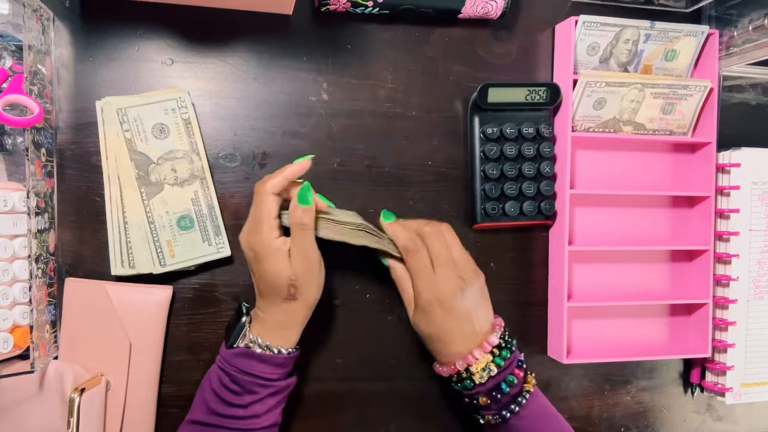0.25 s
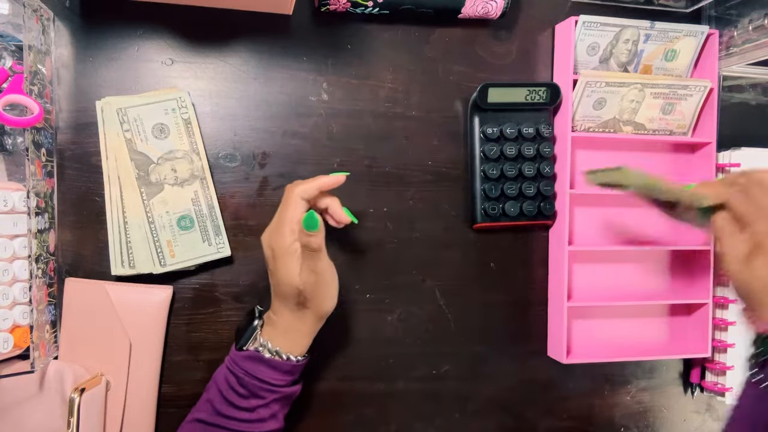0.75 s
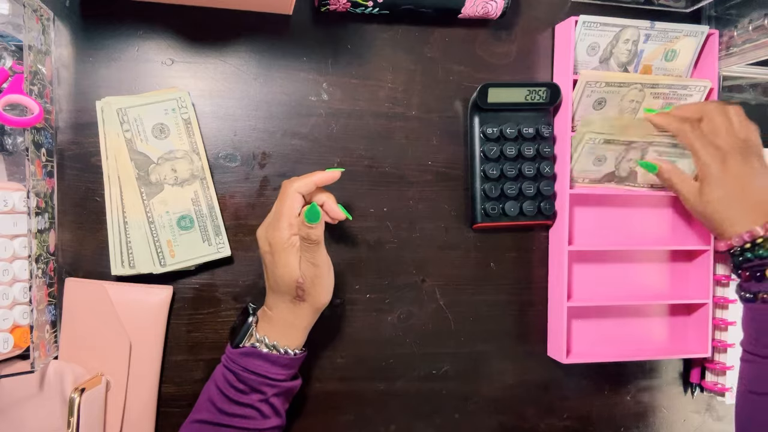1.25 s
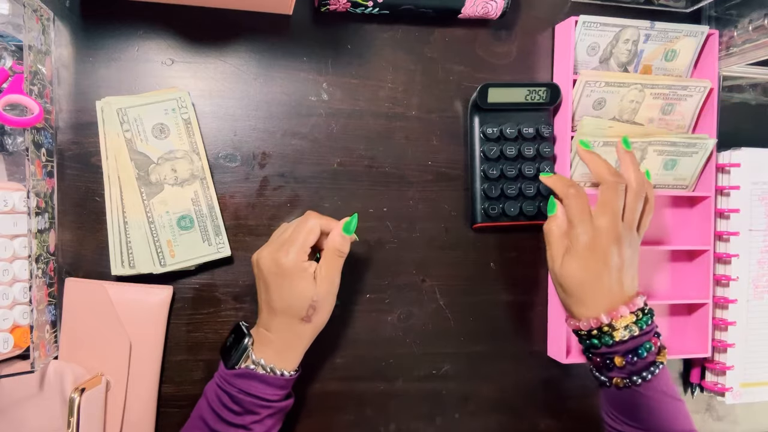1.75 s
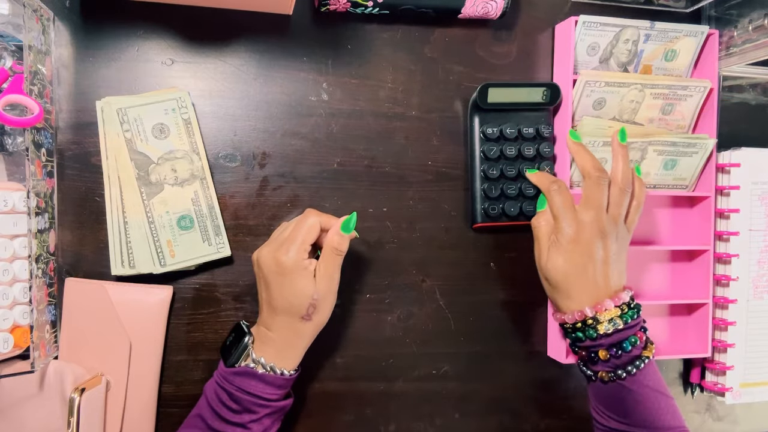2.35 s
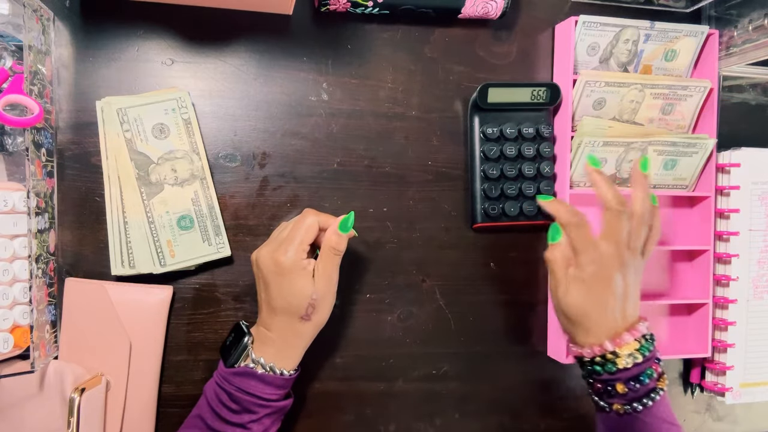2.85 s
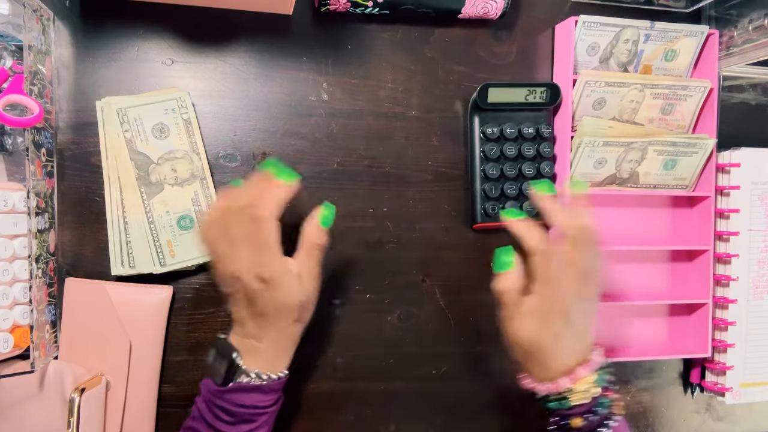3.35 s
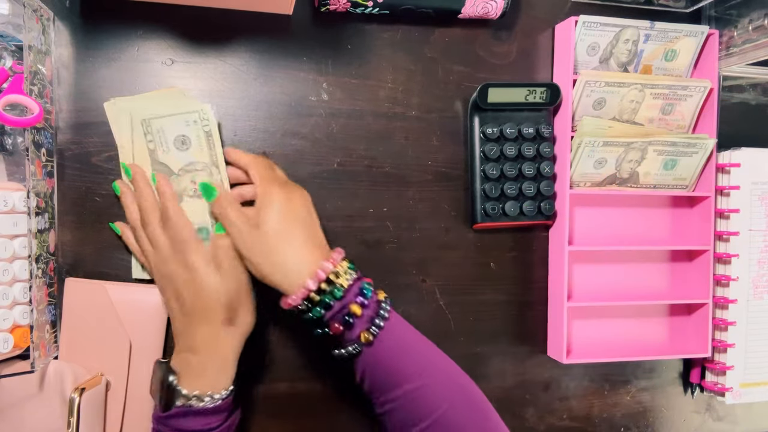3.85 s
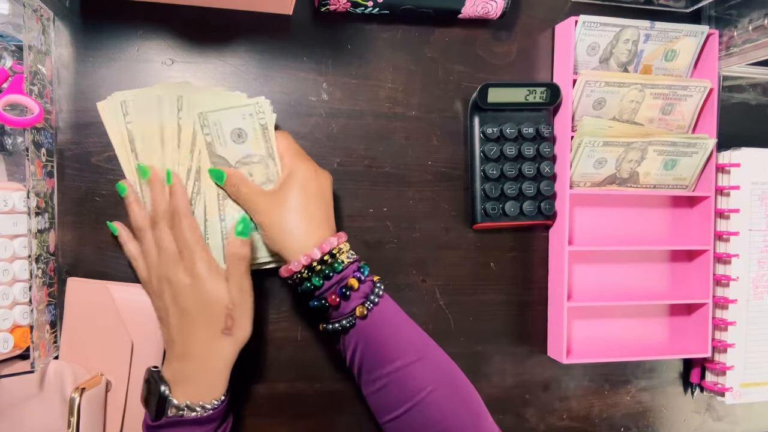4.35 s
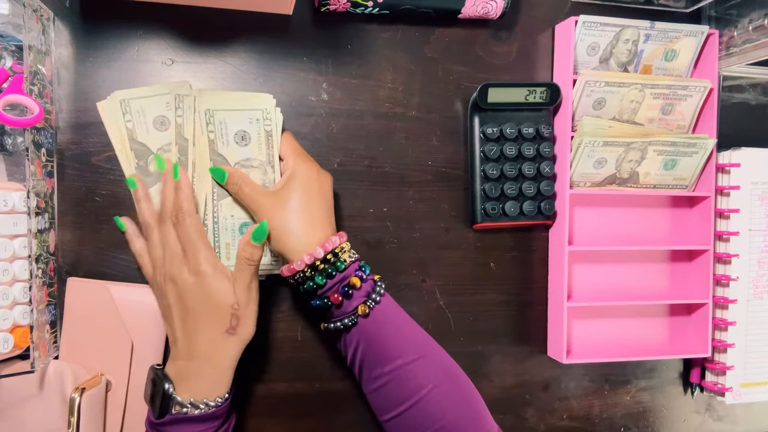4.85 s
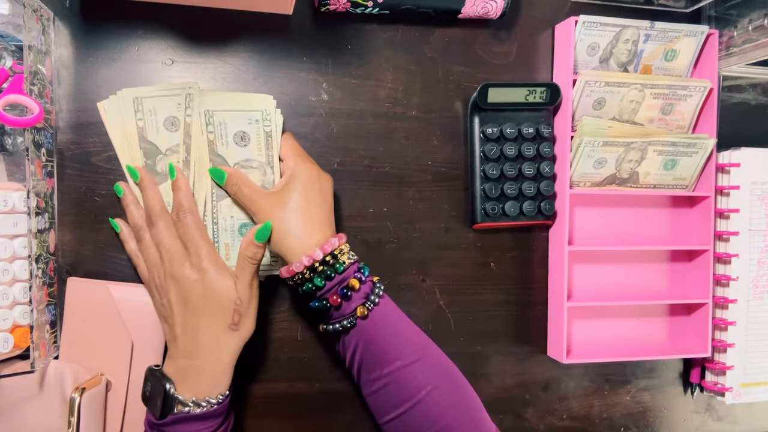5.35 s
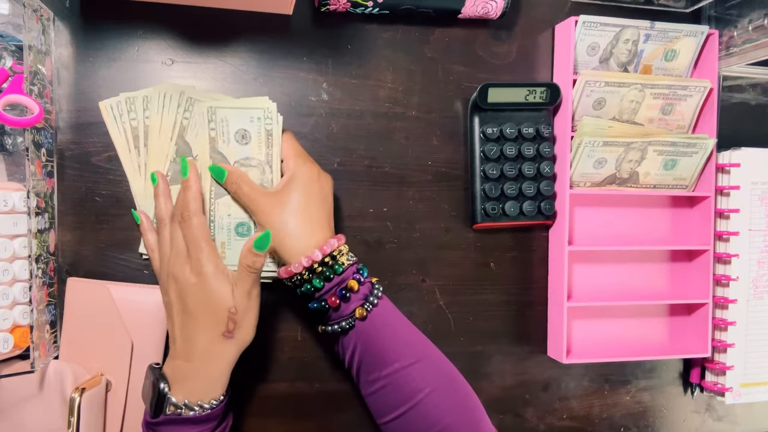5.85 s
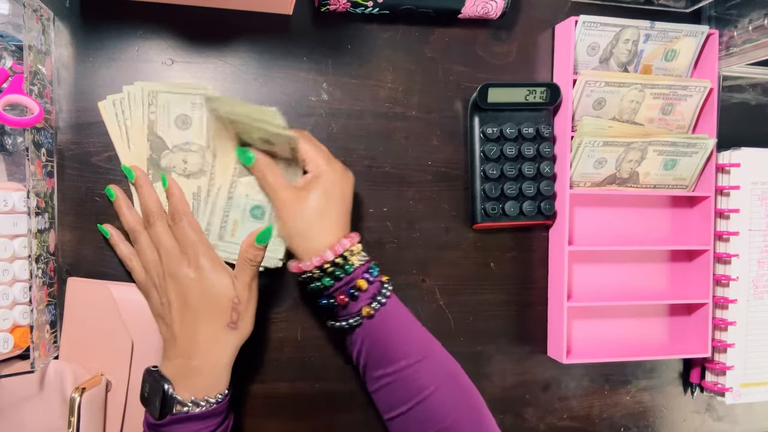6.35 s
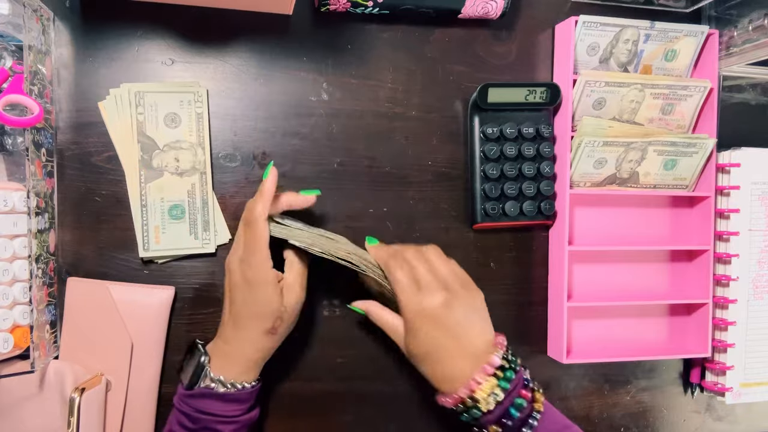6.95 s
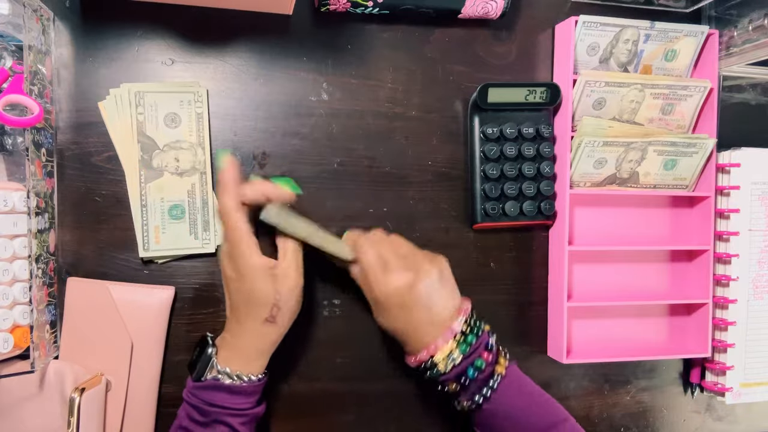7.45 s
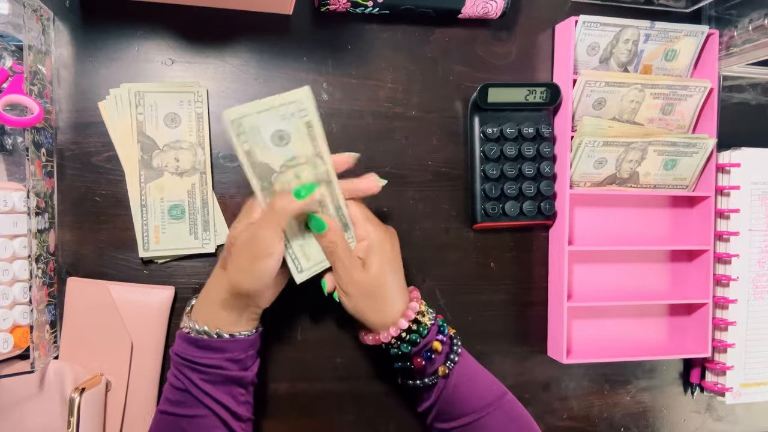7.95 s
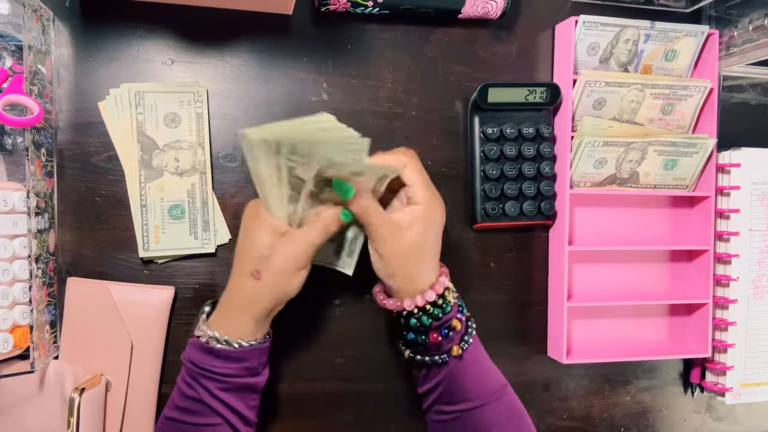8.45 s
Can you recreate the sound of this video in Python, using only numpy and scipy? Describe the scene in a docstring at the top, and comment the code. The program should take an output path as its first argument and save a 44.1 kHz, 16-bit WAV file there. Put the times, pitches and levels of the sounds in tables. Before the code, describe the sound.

Close stereo pickup at a desk in a quiet room with short reverberation, low rumble and soft air. From 0 s paper notes slide with flickering hiss and fine crackle; a bundle edge knocks at 0.25 s. Stronger rustles and papery snaps come at 1.0-1.3 s, fading by 1.6 s with a bead tick. Four separate clacky plastic calculator presses follow at about 2.15, 2.35, 2.7 and 3.1 s, each with a lighter return click; a faint low hum runs from 2.15 to 4 s. From 3.3 s paper sliding returns, with a soft desk touch at 3.55 s and irregular gentle shuffles and small snaps through 6.5 s. At 6.7 s the bundle strikes the desk sharply with a bright swish. Slides, dull thuds near 7.3 s and crisp flicks at 7.7-7.9 s lead to a very loud snap at 8.5 s and a rapid cluster of rustling snaps.

```python
"""Paper notes sorted at a desk in a quiet room, heard by two microphone ports over steady rumble and air.
From the start notes slide (flickering band noise, crackle) and snap (resonant bursts); an early bundle knock.
From 2.1 s four clacky calculator presses (bursts plus ringing modes), under a faint hum until 4 s.
From 3.3 s slides and snaps return; the bundle knocks again near 6.7 s, loud snaps follow near 8.5 s.
Soft desk thuds and bracelet-bead ticks (resonant bursts) fall in between."""
import sys
import numpy as np
from scipy import signal
from scipy.fft import rfft, irfft, next_fast_len
from scipy.io import wavfile

SR = 44100
rng = np.random.default_rng(int(sys.argv[2]) if len(sys.argv) > 2 else 0)


def materialize(psi):
    """Save the field psi as 16-bit PCM at rate SR to the path in sys.argv[1].

    A 1-D psi becomes a single channel; in a 2-D psi each row is a channel.
    """
    bounded = np.clip(np.atleast_2d(psi).T, -1, 1)
    quanta = np.round(bounded * 32767).astype(np.int16)
    wavfile.write(sys.argv[1], SR, quanta)


N = 383229

LEAN_DB, LEAN_SPREAD_DB = -4.5, 2.5   # left-right lean of the hands' sounds

# note strokes, relative levels: [start/s, swell/s, hold/s, hiss/dB, body re hiss/dB, dull re hiss/dB]
STROKES = [(0.0, 0.0065, 0.075, -66, -6, -8.5), (0.055, 0.043, 0.023, -63, -2, -4),
           (0.168, 0.026, 0.045, -71.5, -8, -4), (0.304, 0.039, 0.22, -63.5, -4.5, -9.5),
           (.62, 0.05, 0.24, -82, -6.5, -7), (0.972, 0.018, .1, -59.5, -3, -0.5),
           (1.099, 0.038, .01, -52.5, 5, -1.5), (1.163, 0.025, 0.046, -61.5, 4, -0.5),
           (1.249, 0.052, 0.02, -53, 2.5, -7), (1.445, 0.048, .03, -76, -11.5, -13),
           (1.537, 0.016, 0.019, -62.5, -18, -22), (3.3, 0.34, 0.048, -66.5, -13, -13),
           (3.495, 0.025, 0.14, -70, -3, -5), (3.651, 0.054, 0.053, -64, -4.5, 2.5),
           (3.78, 0.029, 0.1, -68, -3.5, -13), (3.977, 0.024, 0.019, -56.5, -7, -8.5),
           (4.093, .03, 0.092, -65, -5, -1.5), (4.251, 0.022, 0.015, -74, 8, 15.5),
           (4.297, 0.066, 0.065, -64.5, -2.5, -16), (4.49, 0.016, 0.0058, -78, 7, -8),
           (4.632, 0.069, 0.022, -57.5, 0, -8), (4.938, 0.03, 0.04, -68.5, 3, -6),
           (4.998, 0.021, 0.019, -67.5, 5, -3), (5.139, 0.025, 0.0078, -76.5, 7, 0.5),
           (5.432, 0.024, 0.029, -74, -9.5, -9), (5.551, 0.073, .04, -82, -4, -4),
           (5.667, 0.035, 0.036, -59.5, -0.5, -4.5), (5.847, .03, 0.046, -76.5, -2, -2),
           (6.017, 0.043, 0.2, -73, -5, -13), (6.188, 0.042, 0.041, -63, -0.5, -18),
           (6.298, 0.035, 0.08, -70.5, -1, -13), (6.458, .03, 0.083, -74, -8, -10),
           (6.665, .05, .01, -60.5, -1.5, 2), (6.698, 0.021, .005, -42, -1, -7.5),
           (6.798, 0.038, 0.029, -55.5, -3.5, -12), (6.894, 0.027, 0.3, -69, -4.5, -3),
           (7.264, 0.035, 0.055, -65, -10, -1), (7.361, 0.074, 0.012, -56.5, 0.5, -3),
           (7.522, 0.076, 0.2, -69, -5.5, -8), (7.65, 0.088, 0.023, -60, -7, -7),
           (7.769, 0.061, 0.0077, -58.5, -5.5, -14), (7.882, 0.034, 0.06, -64, -9.5, -20),
           (8.024, 0.036, 0.043, -62.5, -13, -8), (8.117, 0.069, 0.037, -63.5, -6, -18),
           (8.262, 0.045, 0.0086, -62.5, -1, -1.5), (8.34, .04, 0.09, -67, -13, -12),
           (8.5, 0.017, .05, -62, -16, -10), (8.553, 0.046, 0.044, -41.5, -4, -12.5)]
SWELL_DB, FADE_DB_PER_S = 17, 279.5
BRIGHT_DB, BRIGHT_PER_BODY = -5, -0.4   # bright re hiss, less when the body is strong


def stroke_levels():
    """Gains of dull, body, hiss and bright bands: strokes swell, hold and fade, summed in power."""
    t = np.arange(0, N, 64) / SR
    power = 1e-14
    for start, swell, hold, hiss_db, body_db, dull_db in STROKES:
        rise_db = np.minimum(SWELL_DB * ((t - start) / max(swell, .005) - 1), 0)
        fade_db = FADE_DB_PER_S * np.maximum(t - start - swell - hold, 0)
        band_db = np.array([dull_db, body_db, 0, BRIGHT_DB + BRIGHT_PER_BODY * body_db])
        level_db = np.maximum(hiss_db + rise_db - fade_db, -150)
        power = power + from_db(level_db + band_db[:, None]) ** 2
    return [np.interp(np.arange(N) / SR, t, gain) for gain in np.sqrt(power)]


def crackle():
    """Bent sheets ring at pitches that come and go, fed by rubbing and clumps of tiny crease pops."""
    born = rng.random(N) < 350 * from_db(8 * drift(12)) / SR   # about 350 pops/s, clumped
    height = from_db(5.5 * np.minimum(rng.exponential(1, N), 4))
    pops = rms_one(born * height * rng.choice([-1, 1], N))
    dealt = rng.integers(0, 10, N)   # which resonance each pop feeds
    rub = 0.12 * rng.standard_normal(N)
    out = 0
    for k, hz in enumerate(np.geomspace(950, 2300, 10)):
        ring = signal.iirpeak(hz, 5.0, SR)
        feed = pops * (dealt == k) + from_db(5.5 * drift(8)) * rub
        out = out + signal.lfilter(*ring, signal.lfilter(*ring, feed))
    return rms_one(out)


# paper noise colour, used by slides and hits: [f/Hz, level/dB per Hz, relative]
PAPER = [(150, -3), (270, 0.5), (480, -1.5), (700, -4.5), (1100, -1), (2200, -3.5), (2800, -6),
         (4100, -2.5), (5500, -5.5), (8000, -5.5), (12000, -4), (17000, -2.5)]


def slide():
    """Fibres rub as hiss that flickers band by band; creases crackle in the body band."""
    gains = stroke_levels()
    together = drift(15)
    mix = 0
    for gain, part in zip(gains, bands(colour(rng.standard_normal(N), PAPER))):
        flicker_db = 2.4 * together + 1.2 * drift(30)
        mix = mix + gain * from_db(-3.5 + flicker_db) * part
    mix += gains[1] * from_db(-3) * crackle()
    return leaning(mix, LEAN_DB + LEAN_SPREAD_DB * drift(8.9))


# creases and edges, relative levels: [t/s, level/dB, f/Hz, t60/s, dull/dB, bright/dB]
SNAPS = [(0.235, -49, 1880, 0.067, -34, 4), (0.379, -45, 980, 0.079, -34, -15),
         (0.528, -48.5, 3200, .035, -24, -18), (0.623, -65, 4430, .04, -10, -20),
         (0.983, -44.5, 1830, .033, -8, -11), (0.999, -39, 1400, 0.036, -15, -26),
         (1.124, -48, 2080, .03, -23, -2), (1.149, -30.5, 2210, 0.077, -19, -14),
         (1.178, -39, 1310, 0.037, -30, -21), (1.295, -44.5, 1050, .03, 2, -10),
         (1.312, -38, 1180, 0.054, -8.5, -7), (3.999, -48, 1880, 0.019, -24.5, -9.5),
         (4.098, -51.5, 1340, 0.059, -30, -16), (4.603, -48.5, 1310, 0.059, -31, -8),
         (4.798, -50, 1630, 0.039, -6.5, -28), (4.901, -57.5, 990, 0.055, -27.5, -4),
         (4.966, -46, 1300, .024, -3.5, -22), (5.162, -53.5, 1640, .047, -30, -27),
         (5.269, -50.5, 1130, 0.037, -1, -15), (5.869, -59.5, 1400, 0.065, -27.5, -20),
         (6.197, -55.5, 1800, .055, -21, -10.5), (6.402, -52, 1956, .016, -13, -9),
         (6.431, -45.5, 1590, .026, -22.5, -19), (7.053, -43.5, 1250, 0.058, -5.5, -14),
         (7.196, -55, 4400, .028, -21.5, -7), (7.664, -48.5, 4680, 0.065, -26, -17.5),
         (7.719, -42, 2570, 0.025, -31, 0.5), (7.732, -39.5, 3600, .022, -30, -15),
         (7.742, -47, 1330, .02, -25, -17), (7.86, -33.5, 1770, .021, -23, -25),
         (8.063, -54, 3020, 0.029, -19.5, -12), (8.324, -41.5, 766, 0.05, -13, -9),
         (8.446, -40.5, 980, 0.02, -3.5, -25), (8.476, -35.5, 825, 0.053, -22, -17),
         (8.49, -12.5, 2600, 0.02, -23.5, -10.5), (8.549, -24.5, 1900, 0.018, -21, -14),
         (8.568, -34.5, 2200, .035, -16, -12), (8.608, -22.5, 900, 0.073, -17, -8.5),
         (8.622, -20.5, 980, 0.041, -9, -11), (8.646, -22.5, 1060, 0.031, -17, -13)]
SNAP_DULL_HZ = 640


def snaps():
    """A crease or edge flips abruptly: a click excites a mid and a dull resonance."""
    return hits([(s, db, hz, SNAP_DULL_HZ, *rest) for s, db, hz, *rest in SNAPS])


# bundle edges landing one after another, relative levels: [t/s, level/dB, f/Hz, dull f/Hz, bright/dB]
KNOCKS = [(0.247, -43, 1760, 400, -25.5), (0.261, -24, 2580, 260, -26), (0.265, -28, 1700, 250, -25.5),
          (6.717, -18, 3660, 520, -0.5), (6.722, -10.5, 984, 500, -28), (6.731, -21, 4100, 440, -21),
          (6.74, -22.5, 2010, 510, -28)]
KNOCK_T60_S, KNOCK_DULL_DB = 0.063, -3.5


def knocks():
    """Bundle edges strike the desk in quick succession, each a burst with two resonances."""
    return hits([(s, db, hz, dull_hz, KNOCK_T60_S, KNOCK_DULL_DB, bright_db)
                 for s, db, hz, dull_hz, bright_db in KNOCKS])


# key press steps, relative levels: [t/s, level/dB, cap f/Hz, dull/dB]
NAIL_TOUCHES = [(2.139, -34.5, 2370, -38), (2.332, -32, 2320, -34), (2.669, -31, 1360, -17),
                (3.097, -38.5, 2740, -17.5)]
BOTTOMINGS = [(2.164, -24, 2310, -7.5), (2.347, -21.5, 2480, -14.5), (2.686, -27.5, 2600, -2),
              (3.112, -22.5, 2130, -11)]
RETURNS = [(2.241, -30, 1010, -16), (2.419, -29.5, 2250, -12), (2.751, -32, 2320, -5.5),
           (3.181, -26.5, 1190, -13.5)]
# contacts within a step: [offset from step t/s, level/dB re step, t60/s, dull/dB re step, bright/dB]
TOUCH = [(0, 0.5, 0.026, -0.5, -1.5)]
BOTTOMING = [(-.006, -9.5, 0.067, -11.5, 3.5), (0, 1.5, 0.02, 1, -12), (.011, -8, .022, 1.5, -7)]
RETURN = [(0, 1, 0.018, 0.5, -4), (.005, -9, 0.023, 3.5, -9)]
# cap noise colour: [f/Hz, level/dB per Hz, relative]
PLASTIC = [(150, 4.5), (350, 10.5), (700, -9), (1200, -6.5), (2300, -6.5), (4000, -7.5), (8000, -3.5),
           (14000, 6.5), (17000, -10.5)]
# modes of calculator case and caps, then of its base on the desk: [f/Hz, level/dB, t60/s], relative
CASE = [(1118, -3, 0.1), (1360, 4.5, 0.036), (1852, -3, 0.18), (2210, -0.5, 0.098), (2140, -12.5, 0.13),
        (2560, -18, 0.033), (2740, -1.5, 0.1), (3790, -6.5, 0.12), (4154, -10.5, 0.23), (4660, -8.5, 0.036),
        (5230, -14.5, 0.027)]
BASE = [(208, -7.5, 0.11), (272, -9, 0.24), (361, -7.5, 0.058)]


def keys():
    """Each contact rattles its cap, rings the case faintly and pushes the base on the desk."""
    rows = [(moment + after, db + contact_db, hz, t60, dull_db + contact_dull_db, bright_db)
            for steps, contacts in [(NAIL_TOUCHES, TOUCH), (BOTTOMINGS, BOTTOMING), (RETURNS, RETURN)]
            for moment, db, hz, dull_db in steps
            for after, contact_db, t60, contact_dull_db, bright_db in contacts]
    s, level_db, cap_hz, t60, dull_db, bright_db = np.transpose(rows)
    noise = resonate(struck(len(s), PLASTIC, crack_db=14), cap_hz, 9.0, 4.0)
    rattle = bursts(noise, level_db - 4, t60, dull_db + 2.5, bright_db, tail_db=-16.5)
    case = ringing(CASE, level_db - 23.5)
    base = ringing(BASE, level_db + dull_db - 9)
    return place(s, rattle + case + base, scattered_lean(len(s)))


# soft touches on the desk: [t/s, level of the dull part/dB, relative]
THUDS = [(3.546, -48.5), (3.739, -61), (4.29, -62.5), (7.25, -44.5), (7.365, -40.5)]
# one row: [f/Hz, dull f/Hz, t60/s, dull re middle/dB, bright re middle/dB]
THUD_SHAPE = (1093, 257, 0.14, 18, -20)


def thuds():
    """Soft touches on the desk, mostly dull resonance."""
    return hits([(s, db - THUD_SHAPE[3], *THUD_SHAPE) for s, db in THUDS])


# bracelet beads: [t/s, level of the bright part/dB, relative]
TICKS = [(.504, -51), (1.398, -55), (1.543, -39.5), (4.964, -44.5), (6.465, -56.5), (6.509, -63),
         (7.293, -55), (7.508, -43), (8.071, -45)]
# one row: [f/Hz, dull f/Hz, t60/s, dull re middle/dB, bright re middle/dB]
TICK_SHAPE = (5009, 248, 0.08, -28, 16.5)


def bead_ticks():
    """Small hard beads click, mostly in the bright band."""
    return hits([(s, db - TICK_SHAPE[4], *TICK_SHAPE) for s, db in TICKS])


ROOM_T60_S, ROOM_DB = 0.25, -12.5


def room(x):
    """Two unrelated dying noise tails, duller than the source."""
    t = np.arange(round(.4 * SR)) / SR
    tails = rng.standard_normal((2, len(t))) * from_db(-60 * t / ROOM_T60_S) * (t > .004)
    tails = colour(tails, [(200, -5.5), (3000, -4.0), (15000, -10.5)])
    tails = tails / np.sqrt(np.sum(tails ** 2, axis=1, keepdims=True))   # unit energy
    return from_db(ROOM_DB) * signal.fftconvolve(x[None], tails, axes=1)[:, :N]


# level of rumble and air ahead of the port colours: [t/s, level/dB]
RUMBLE = [(0.0, -61), (2.83, -62), (3.17, -62.5), (3.41, -62.5), (3.82, -59), (4.23, -64), (5.28, -65),
          (5.81, -63), (6.58, -65), (6.73, -61.5), (8.3, -64), (8.69, -67.5)]
# spectrum of rumble and air: [f/Hz, level/dB per Hz, relative]
AIR = [(15, -73), (25, -40), (45, -15), (66, -2), (92, -13.5), (126, -8), (190, -27), (286, -30),
       (323, -48), (401, -33.5), (770, -47), (1670, -46), (5850, -56.5), (6280, -54), (8000, -58.5),
       (10400, -77.5), (17600, -120)]
# faint far hum ahead of the port colours: [t/s, f/Hz, rms level/dB]
DRONE = [(2.15, 165, -69), (2.65, 166, -68), (2.8, 175, -66), (3.3, 176, -66), (3.75, 176, -68),
         (4.0, 176, -75)]


def background():
    """Low rumble and air as unrelated coloured noise, plus a far hum as a gliding sine."""
    spectrum = AIR + [(17000, AIR[-1][1] - 3)]   # flat floor above 17 kHz
    air = from_db(in_time(RUMBLE)[0]) * rms_one(colour(rng.standard_normal((2, N)), spectrum))
    hum_hz, hum_db = in_time(DRONE)
    t = np.arange(N) / SR
    sounding = np.clip(np.minimum(t - DRONE[0][0], DRONE[-1][0] - t) / 0.033, 0, 1)
    hum = np.sqrt(2) * from_db(hum_db) * np.sin(2 * np.pi * np.cumsum(hum_hz) / SR)
    air[0] += sounding * hum
    return air


def hits(rows):
    """Clicks with two resonances; rows [t/s, level/dB, f/Hz, dull f/Hz, t60/s, dull/dB, bright/dB]."""
    s, level_db, centre_hz, dull_hz, t60, dull_db, bright_db = np.transpose(rows)
    noise = resonate(struck(len(s), PAPER, crack_db=16), centre_hz, 3.5, 3.35)
    noise = resonate(noise, dull_hz, 3.35, 4.0)
    sounds = bursts(noise, level_db - 5.5, t60, dull_db, bright_db, tail_db=-20.0)
    return place(s, sounds, scattered_lean(len(s)))


def bursts(noise, level_db, t60, dull_db, bright_db, tail_db):
    """Dying noise with a weak longer tail; the lows swell later, last longer and thump the desk."""
    t = np.arange(noise.shape[1]) / SR
    dull, _, _, bright = bands(noise)
    middle = rms_one(band_pass(noise, 2, [700, 9500]))
    desk = rms_one(band_pass(noise, 2, [52, 140]))
    fall = (dying(t60) + from_db(tail_db) * dying(t60 + .15)) * (1 - np.exp(-t / 0.0006))
    swell = dying(t60 + 0.05) * (1 - np.exp(-t / .003))
    thump = from_db(-16.5) * desk * dying(t60 + 0.45) * (1 - np.exp(-t / 0.016))
    upper = fall * (middle + from_db(bright_db)[:, None] * bright)
    lower = from_db(dull_db)[:, None] * (swell * dull + thump)
    return from_db(level_db)[:, None] * (upper + lower)


def struck(count, spectrum, crack_db):
    """Coloured noise that opens with one hard click."""
    noise = rng.standard_normal((count, 6000))
    noise[:, 30] += from_db(crack_db) * np.sign(noise[:, 0])
    return colour(noise, spectrum)


def resonate(rows, centres_hz, sharp, gain):
    """Adds one broad resonance to each row."""
    return np.array([x + gain * signal.lfilter(*signal.iirpeak(hz, sharp, SR), x)
                     for x, hz in zip(rows, centres_hz)])


def ringing(modes, level_db):
    """Every blow rings the modes with new strengths and slightly shifted pitches."""
    out = 0
    t = np.arange(6000) / SR
    for hz, mode_db, t60 in modes:
        chance = rng.standard_normal((len(level_db), 2))
        height = from_db(level_db + mode_db + 3.2 * chance[:, 0])
        wave = np.sin(2 * np.pi * hz * np.outer(1 + 0.022 * chance[:, 1], t))
        out = out + height[:, None] * wave * from_db(-60 * t / t60)
    return out


def dying(t60, size=6000):
    """One exponential fall for each decay time, limited to 0.004-0.4 s."""
    return from_db(-60 * np.arange(size) / SR / np.clip(t60, .004, .4)[:, None])


def band_pass(x, order, edges_hz):
    """Butterworth band-pass."""
    return signal.sosfilt(signal.butter(order, edges_hz, "band", fs=SR, output="sos"), x)


# dull, body, hiss and bright bands: [low edge/Hz, high edge/Hz]
EDGES_HZ = [(150, 700), (700, 2600), (2600, 9500), (9500, 18000)]


def bands(x):
    """Dull, body, hiss and bright part, each of rms 1."""
    return [rms_one(band_pass(x, 3, hz)) for hz in EDGES_HZ]


def scattered(x):
    """Short reflections off hands and desk: two echo patterns in a slowly drifting mix."""
    paths = rng.standard_normal((2, 900)) * from_db(-60 * np.arange(900) / SR / .015)
    first, second = signal.fftconvolve(x[None], rms_one(paths) / 30, axes=1)[:, :N]
    angle = 2 * drift(2)
    return first * np.cos(angle) + second * np.sin(angle)


def scattered_lean(count):
    """Left-right lean in dB, new for every event."""
    return LEAN_DB + LEAN_SPREAD_DB * rng.standard_normal(count)


def leaning(x, pan_db):
    """The sound, and the share of it that leans to the left."""
    return np.array([x, x * np.tanh(pan_db * np.log(10) / 40)])


def place(times, sounds, pan_db):
    """Lays short sounds on the time line."""
    out = np.zeros((2, N + sounds.shape[1]))
    for s, sound, pan in zip(times, sounds, pan_db):
        start = round(s * SR)
        out[:, start:start + len(sound)] += leaning(sound, pan)
    return out[:, :N]


def drift(rate_hz):
    """Slow random curve of rms 1: noise through a two-pole low-pass."""
    r = np.exp(-2 * np.pi * rate_hz / SR)
    return rms_one(signal.lfilter([1], [1, -2 * r, r * r], rng.standard_normal(N + SR))[SR:])


def colour(x, spectrum, turn_rad=0):
    """Shapes x by a [f/Hz, level/dB] table and turns its phase."""
    size = next_fast_len(x.shape[-1] + 512)
    hz = np.arange(size // 2 + 1) * SR / size + 1
    table_hz, table_db = np.array(spectrum).T
    gain = from_db(np.interp(np.log(hz), np.log(table_hz), table_db)) * np.exp(1j * turn_rad)
    return irfft(rfft(x, size) * gain, size)[..., :x.shape[-1]]


def in_time(rows):
    """Table columns as curves, one value a sample."""
    s, *columns = np.transpose(rows)
    return [np.interp(np.arange(N) / SR, s, c) for c in columns]


def from_db(db):
    """Amplitude ratio of a level in dB."""
    return 10 ** (np.asarray(db) / 20)


def rms_one(x):
    """Scales each row to rms 1."""
    return x / np.sqrt(np.mean(x ** 2, axis=-1, keepdims=True) + 1e-20)


# what both ports hear alike (cancels near 10 kHz) and oppositely: [f/Hz, level/dB]
PORT_SUM = [(100, -0.5), (7600, 0.5), (8100, -1), (8600, -16.5), (11200, -17), (11900, 2), (14000, 1),
            (15800, 7.5), (16300, -35.5)]
PORT_DIFF = [(50, -29), (150, -16), (300, -5), (480, -1), (700, 1), (2500, 2.5), (4500, -2), (8000, 5),
             (13000, 4), (14300, -23), (17000, -40.5)]
PORT_TURN_RAD = -0.67   # the port difference trails


def scene():
    """Two ports as sum and difference; the difference hears near sounds phase-turned and scattered."""
    near, lean = slide() + snaps() + knocks() + keys() + thuds() + bead_ticks()
    diffuse = room(near) + background()
    alike = colour(near + diffuse[0], PORT_SUM)
    opposite = colour(.5 * near, PORT_DIFF, PORT_TURN_RAD)
    opposite += colour(0.76 * scattered(near) + lean + diffuse[1], PORT_DIFF)
    return np.array([alike + opposite, alike - opposite])


CUTOFF_HZ = 16900


def record(dry):
    """Steep low-pass cuts the top."""
    return signal.sosfilt(signal.cheby2(12, 70, CUTOFF_HZ, fs=SR, output="sos"), dry)


dry = scene()
out = record(dry)
materialize(out)
```